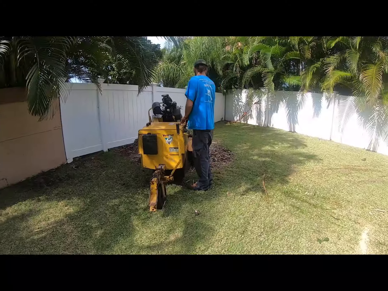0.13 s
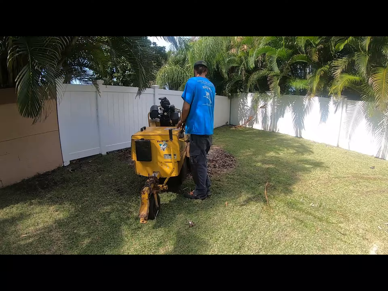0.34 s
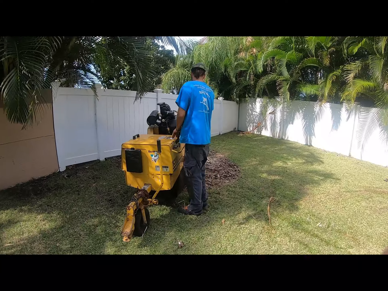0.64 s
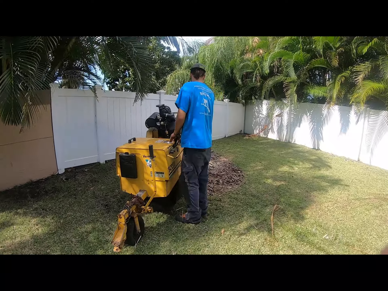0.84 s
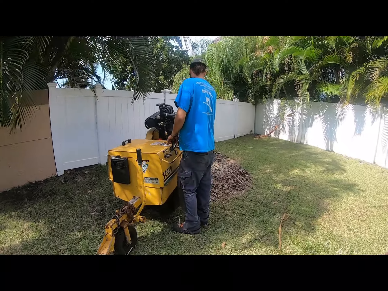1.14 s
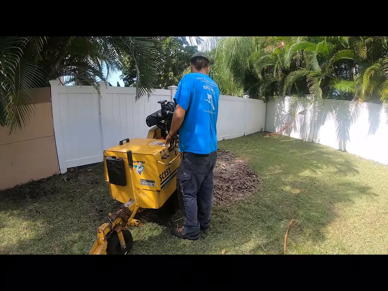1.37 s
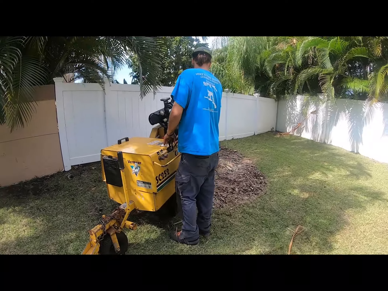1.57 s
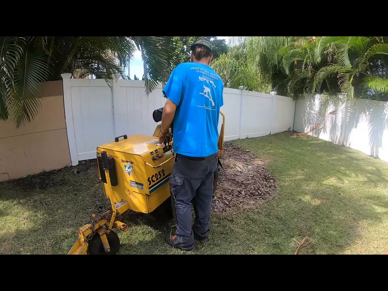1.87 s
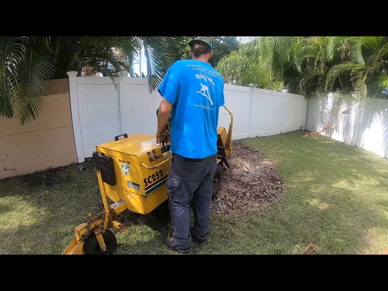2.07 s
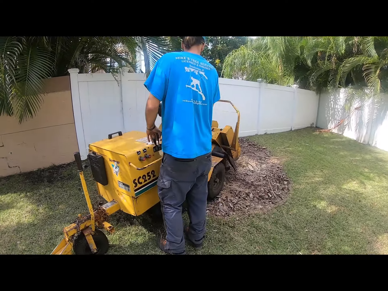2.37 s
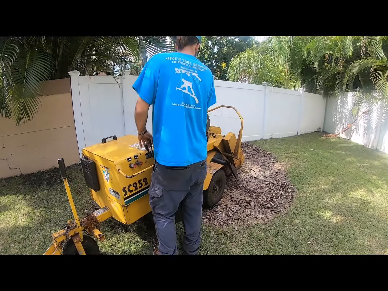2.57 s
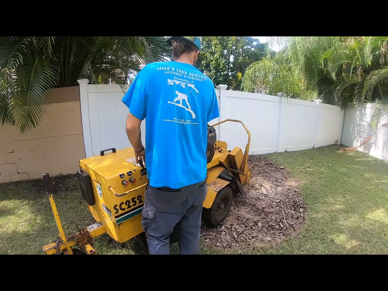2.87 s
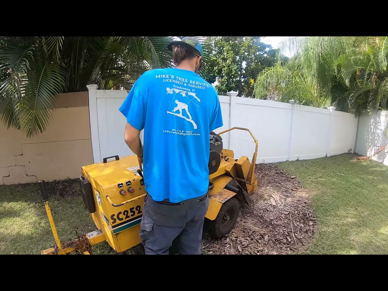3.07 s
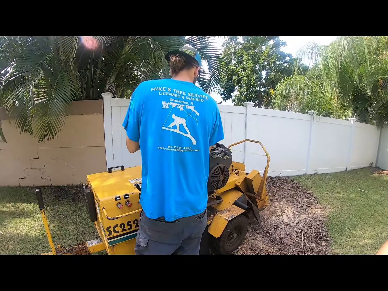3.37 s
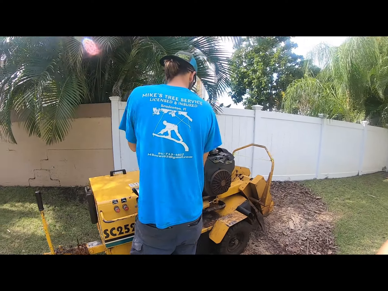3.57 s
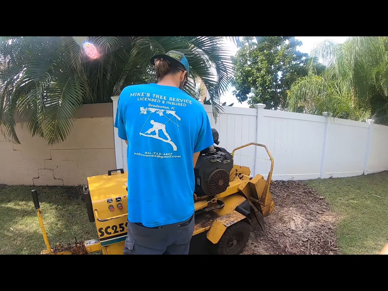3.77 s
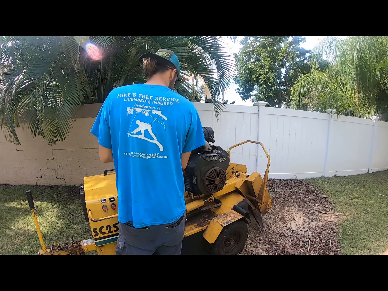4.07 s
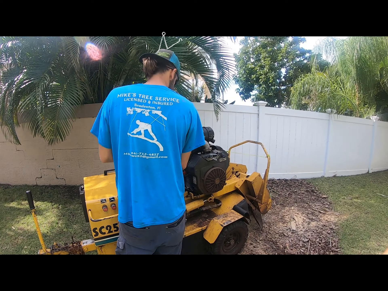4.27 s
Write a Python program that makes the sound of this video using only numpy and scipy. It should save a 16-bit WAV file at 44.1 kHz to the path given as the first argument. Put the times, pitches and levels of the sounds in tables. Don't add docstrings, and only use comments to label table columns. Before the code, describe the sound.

A petrol stump grinder runs at speed on a fenced lawn. Uneven, rapid exhaust throbbing pumps a thick low roar, with belt-driven shaft hum and fan noise. The handheld stereo microphone starts some distance away and quickly closes in; a bright valve rattle comes forward midway, then fades. Engine speed sags and recovers slightly. Faint slaps return from the fence, and the sound stops suddenly.

```python
import sys
import numpy as np
from scipy import signal
from scipy.fft import rfft, irfft, next_fast_len
from scipy.io import wavfile
from scipy.ndimage import uniform_filter1d

SR = 44100
rng = np.random.default_rng(int(sys.argv[2]) if len(sys.argv) > 2 else 0)


def bounce(signal):
    frames = np.transpose(np.atleast_2d(signal))
    limited = np.clip(frames, -1, 1)
    pcm = np.round(limited * 32767).astype(np.int16)
    wavfile.write(sys.argv[1], SR, pcm)


def decibels_to_gain(level_db):
    exponent = np.asarray(level_db, float) / 20
    return 10 ** exponent


N = 194569
FIRST_FIRES, SECOND_FIRES, FIRST_STRENGTH = 0.39, 0.98, 0.87


def rms_one(x):
    return x / np.sqrt(np.mean(x ** 2) + 1e-20)


def in_time(rows):
    s, *columns = np.transpose(rows)
    return [np.interp(np.arange(N) / SR, s, column) for column in columns]


def at_hz(points, hz):
    point_hz, level_db = np.array(points)[:, 0], np.array(points)[:, 1]
    return np.interp(np.log(hz + 1), np.log(point_hz), level_db)


def drift(rate_hz):
    r = np.exp(-80 * np.pi * rate_hz / SR)
    noise = rng.standard_normal(N // 40 + 2002)
    slow = signal.lfilter([1], [1, -2 * r, r * r], noise)[2000:]
    return np.interp(np.arange(N) / 40, np.arange(len(slow)), rms_one(slow))


def band(x, low_hz, high_hz, order=2):
    return signal.sosfilt(signal.butter(order, [low_hz, high_hz], "band", fs=SR, output="sos"), x)


def puffs(cycles, at, decay, spread_db):
    since = cycles - at
    strength = decibels_to_gain(spread_db * rng.standard_normal(400))
    return strength[np.floor(since).astype(int) + 100] * np.exp(-(since % 1) / decay)


# (time [s], four-stroke cycles [1/s])
ENGINE_SPEED = [(0.15, 29.98), (0.6, 31.15), (0.75, 31.01), (0.9, 30.38), (1.05, 29.28), (1.2, 28.84),
                (1.35, 28.85), (1.5, 29.25), (1.65, 30.05), (1.95, 31.3), (2.4, 31.15), (3.0, 30.3),
                (3.15, 29.33), (3.6, 27.94), (3.75, 28.76), (3.9, 29.3)]


def engine_speed():
    return in_time(ENGINE_SPEED)[0]


def engine_cycles():
    cycles = np.cumsum(engine_speed()) / SR
    return cycles - cycles[round(1.27 * SR)]


# (time [s], level [dB])
EXHAUST_NEAR = [
    (0.2, -26.5),
    (0.41, -24.5),
    (0.53, -16),
    (0.7, -16),
    (0.81, -13.5),
    (1.39, -14.5),
    (2.97, -13),
    (3.05, -12),
    (3.96, -13),
    (4.05, -13.5),
]
# (time [s], level [dB])
CASING_NEAR = [
    (0.2, -24),
    (0.78, -21.5),
    (2.96, -21.5),
    (3.24, -24),
    (3.27, -20),
    (3.49, -23.5),
    (4.02, -23),
    (4.05, -21),
]
# (time [s], level [dB])
FAN_FACING = [
    (0.2, -41.5),
    (0.27, -39.5),
    (0.77, -47),
    (1.67, -45),
    (2.31, -51),
    (3.24, -49),
    (3.28, -46),
    (4.05, -36),
]
# (time [s], level [dB])
INTAKE_FACING = [
    (.2, -69),
    (.55, -75),
    (1.0, -66),
    (1.3, -57),
    (1.75, -54.5),
    (2.6, -69),
    (3.2, -63),
    (4.05, -58),
]


def swings():
    curves = []
    for rows in (EXHAUST_NEAR, CASING_NEAR, FAN_FACING, INTAKE_FACING):
        curves += in_time(rows)
    curves = np.array(curves)
    return curves - curves.mean(axis=1, keepdims=True)


# (time [s], level [dB])
THUMP_NEAR = [(0.2, -19.5), (0.33, -18), (0.54, -21.5), (0.67, -14.5), (0.86, -15.5), (1.55, -12.5),
              (2.3, -17.5), (2.9, -17), (3.09, -19.5), (3.13, -16), (4.05, -15)]
# (order [per cycle], level at free speed [dB], gain per cycle/s of sag [dB],
# share of the thump's swing [1], wander [dB])
FIRING_ORDERS = [
    (1, -26.5, -2, .8, 3),
    (2, -16.5, 0.56, 1.05, 0.17),
    (3, -26.5, 2.5, .1, 2),
    (5, -22, -0.5, 1.2, 1.5),
]


def firing_orders(cycles):
    free_speed = 30
    sag = np.clip(free_speed - engine_speed(), -1.5, 1.2)
    near_db = in_time(THUMP_NEAR)[0]
    near_db = near_db - near_db.mean()
    out = 0
    for k, level_db, load_db, share, wander_db in FIRING_ORDERS:
        first = FIRST_STRENGTH * np.exp(-2j * np.pi * k * FIRST_FIRES)
        second = np.exp(-2j * np.pi * k * SECOND_FIRES)
        gain = decibels_to_gain(level_db + load_db * sag + share * near_db + wander_db * drift(2.8))
        out = out - gain * np.cos(2 * np.pi * k * cycles + np.angle(first + second))
    return np.sqrt(2) * out


# (middle [s], multiple [1], peak
# [dB], length [s])
HOUSING_BOOMS = [(.35, 3, -32, 0.4), (.75, 3, -25, .4), (2.3, 3, -24.5, .4), (3.0, 3, -29, 0.36),
                 (3.5, 3, -18, 0.35), (.2, 5, -28, 0.87), (0.53, 5, -14, .4), (.95, 5, -26, 0.46),
                 (2.35, 5, -20.5, 0.95), (2.95, 5, -22, 0.22), (.25, 6, -27.5, 0.47), (1.2, 6, -21, 0.73),
                 (1.75, 6, -24.5, 0.99), (2.55, 6, -20, 0.27), (3.15, 6, -20.5, 0.54), (1.55, 7, -28, 0.25),
                 (1.95, 7, -29.5, 0.5), (2.5, 7, -21.5, 0.65), (3.0, 7, -21.5, 0.61), (3.62, 7, -21, 0.99),
                 (3.55, 4, -23, .4), (3.12, 9, -24, 0.21), (3.13, 10, -20.5, .4), (2.28, 10, -26.5, .5),
                 (3.11, 12, -25, .35), (0.92, 12, -25.5, 0.42)]


def shaft_hum(cycles):
    t = np.arange(N) / SR
    turns = 1.2 * cycles
    gains = {k: decibels_to_gain(-39.5) for k in (3, 5, 6, 7)}
    for k in (4, 9, 10, 11, 12):
        gains[k] = decibels_to_gain(swings()[0] - 36 + 2.15 * drift(1.5))
    for middle_s, k, peak_db, length_s in HOUSING_BOOMS:
        swell = np.exp(-8 * ((t - middle_s) / length_s) ** 2)
        gains[round(k)] = gains[round(k)] + decibels_to_gain(peak_db) * swell
    out = 0
    for k, gain in gains.items():
        unsteady = gain * decibels_to_gain(1.1 * drift(4))
        slip = .6 * drift(1.5)
        out = out + unsteady * np.cos(2 * np.pi * k * turns + slip + k * k)
    return np.sqrt(2) * out


# (frequency [Hz], level per Hz [dB])
ROAR_COLOUR = [(60, -17), (150, -10), (230, -7.5), (300, -11), (430, -9.5), (560, -25), (760, -19.5),
               (1300, -21), (1650, -25.5), (2330, -26), (4200, -33.5), (6500, -47.5), (10500, -56),
               (11500, -61.5)]
# (frequency [Hz], width [Hz], peak [dB])
CASING_PANELS = [
    (655, 18.8, 4),
    (887, 50, 1),
    (1226, 26, 4),
    (1356, 17, 0.5),
    (2360, 40, 3),
    (8100, 150, 2.5),
    (10230, 300, 4),
]
# (frequency where it rules [Hz], shares of exhaust, casing, fan, intake swing [1])
MACHINE_PARTS = [
    (171, 1.32, 0.53, 0.24, 0.093),
    (400, 0.84, 0, 0, 0.013),
    (1380, .1, .9, 0, 0),
    (3670, 0.24, 0.36, 0.21, 0),
    (7830, 0.15, 0.1, 0.98, 0.055),
    (12800, 0.19, 0.17, 0.24, 0.51),
]


def roar(cycles):
    size = next_fast_len(N)
    hz = np.arange(size // 2 + 1) * SR / size
    colour = decibels_to_gain(at_hz(ROAR_COLOUR, hz))
    for centre_hz, width_hz, peak_db in CASING_PANELS:
        resonance = 1 / (1 + (2 * (hz - centre_hz) / width_hz) ** 2)
        colour = colour * (1 + (decibels_to_gain(peak_db) - 1) * resonance)
    white = rfft(rng.standard_normal((2, size))) * colour
    part_rows = np.array(MACHINE_PARTS)
    curves = part_rows[:, 1:] @ swings()
    part_octaves = np.log2(part_rows[:, 0])
    beat = rms_one(puffs(cycles, FIRST_FIRES, 0.36, 4.0) + puffs(cycles, SECOND_FIRES, 0.25, 0.91))
    soft_beat = uniform_filter1d(beat, size=200)
    together, out = drift(12), 0
    for octave in np.arange(5, 14.1, .5):
        mask = np.cos(np.pi * np.clip(np.log2(hz + 1) - octave, -.5, .5)) ** 2
        place = np.interp(octave, part_octaves, np.arange(6))
        lower = min(int(place), 4)
        level_db = curves[lower] + (place - lower) * (curves[lower + 1] - curves[lower])
        pumped = np.interp(place, np.arange(6), [.45, .3, .13, .13, .12, .1])
        gain = decibels_to_gain(level_db + 0.39 * together + 0.97 * drift(38)) * (1 - pumped + pumped * soft_beat)
        out = out + gain * irfft(white * mask, size)[:, :N]
    return decibels_to_gain(-15.0) * rms_one(out)


# (time [s], level [dB])
VALVE_FACING = [
    (.15, -57.5),
    (.3, -58.5),
    (.5, -64),
    (1.0, -61),
    (1.17, -54.5),
    (1.45, -54.5),
    (1.8, -55),
    (1.95, -58.5),
    (2.4, -66),
    (4.05, -72),
]


def valve_levels():
    near_db = -54.5
    rattle_db, = in_time(VALVE_FACING)
    return rattle_db, rattle_db - np.clip(3 * (near_db - rattle_db), 0, 14)


def valve_tick(cycles):
    unsteady = cycles + .008 * drift(12)
    burst = puffs(unsteady, 0, .09, 2.2) * rng.standard_normal((2, N))
    rattle_db, edge_db = valve_levels()
    rattle = decibels_to_gain(rattle_db + .5) * rms_one(band(burst, 7000, 10500))
    edge = decibels_to_gain(edge_db - 1) * rms_one(band(burst, 10500, 13200, order=3))
    return rattle + edge


def fence(x):
    dull, out = band(x, 130, 1800, order=1), x.copy()
    for delay_s, level_db in [(.0031, -24.5), (.019, -18.5), (.034, -19.5)]:
        lag = round(delay_s * SR)
        out[lag:] += decibels_to_gain(level_db) * dull[:-lag]
    return out


# (from [s], to [s], frequency [Hz], width [Hz], level [dB])
SINGING_PARTS = [(.12, .55, 8070, 70, -57), (.45, 1.15, 410, 25, -27), (1.0, 1.6, 1440, 18, -35),
                 (.5, 1.9, 1260, 25, -36), (1.9, 3.05, 1233, 16, -34), (2.45, 3.05, 1346, 12, -33),
                 (2.3, 3.0, 942, 20, -36), (1.7, 3.0, 2268, 22, -39), (2.4, 3.0, 2428, 22, -41),
                 (3.25, 3.45, 2380, 60, -36), (3.5, 4.1, 1262, 25, -38), (1.7, 3.6, 368, 18, -26),
                 (.7, 1.05, 165, 18, -20), (.42, .68, 184, 8, -18), (2.3, 3.1, 251, 10, -24),
                 (2.95, 3.25, 225, 22, -18), (2.97, 3.6, 432, 18, -22), (2.97, 3.6, 325, 22, -22),
                 (2.98, 3.2, 146, 14, -19)]


def singing():
    t, out = np.arange(N) / SR, 0
    for t0, t1, hz, width_hz, level_db in SINGING_PARTS:
        turns = np.cumsum(hz + .25 * width_hz * drift(width_hz)) / SR
        swell = np.sin(np.pi * np.clip((t - t0) / (t1 - t0), 0, 1)).clip(0) ** .4
        gain = decibels_to_gain(level_db + 2.5 * drift(width_hz / 2))
        out = out + gain * swell * np.sin(2 * np.pi * turns)
    return np.sqrt(2) * out


# (from [s], to [s], low [Hz], high [Hz], level [dB])
WIDE_SPANS = [
    (.17, 0.29, 5400, 15000, -27),
    (.38, 0.45, 4500, 10800, -26),
    (1.18, 1.43, 2860, 11000, -25),
    (1.15, 2.2, 11600, 15000, -6),
    (2.2, 4.06, 11200, 15000, -5),
]
# (frequency [Hz], level [dB])
DIFFERENCE_COLOUR = [
    (400, -7.5),
    (700, -9),
    (1300, -0.5),
    (4000, -0.5),
    (8000, 10),
    (15000, 2),
]
# (time [s], difference level [dB])
SIDE_ON = [
    (3.17, -25),
    (3.55, -9),
    (4.085, -4),
]


def ports(near, other):
    t, hz = np.arange(N) / SR, np.fft.rfftfreq(N, 1 / SR)
    shadow = np.interp(np.log(hz + 1), np.log([1000, 8000]), [.6, .55])
    apart = rfft(other) * np.sqrt(1 - shadow ** 2) - rfft(near) * shadow
    apart = apart * decibels_to_gain(at_hz(DIFFERENCE_COLOUR, hz))
    swing = (t > SIDE_ON[0][0]) * decibels_to_gain(in_time(SIDE_ON)[0])
    side = swing * irfft(apart * (hz > 450) * (hz < 11200), N)
    for t0, t1, low_hz, high_hz, level_db in WIDE_SPANS:
        gate = uniform_filter1d(1. * (t > t0) * (t < t1), size=900)
        side = side + gate * decibels_to_gain(level_db) * irfft(apart * (hz > low_hz) * (hz < high_hz), N)
    return side


def scene():
    cycles = engine_cycles()
    near, other = roar(cycles) + valve_tick(cycles)
    near = fence(near)
    middle = near + firing_orders(cycles) + shaft_hum(cycles) + singing()
    side = ports(near, other)
    return np.array([middle + side, middle - side])


def low_pass(x):
    return signal.sosfilt(signal.butter(12, 15700, fs=SR, output="sos"), x)


def record(dry):
    t = np.arange(N) / SR
    fade_s, full_s, cut_s = 0.11, 0.18, 4.066
    fade_in = np.clip((t - fade_s) / (full_s - fade_s), 0, 1) ** 1.84
    fade = fade_in * np.clip((cut_s - t) / 0.00077, 0, 1)
    rounded = dry / (1 + np.abs(dry / 1.03) ** 6) ** (1 / 6)
    dulled = signal.sosfilt(signal.butter(2, 11500, fs=SR, output="sos"), rounded)
    top_cut = signal.sosfilt(signal.butter(6, 14600, fs=SR, output="sos"), dulled)
    return low_pass(fade * top_cut)


dry = scene()
out = record(dry)
bounce(out)
```